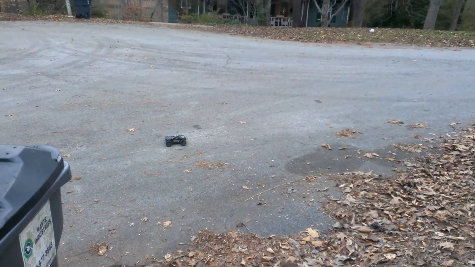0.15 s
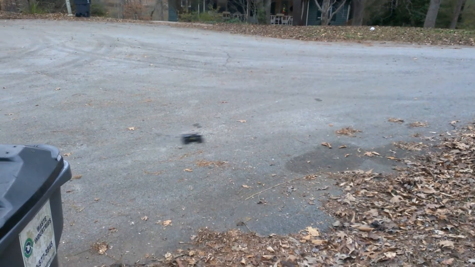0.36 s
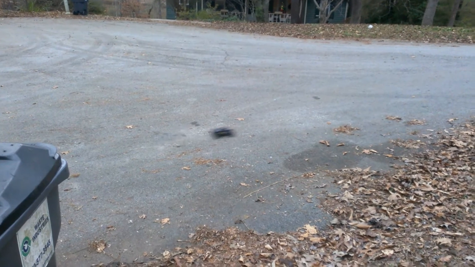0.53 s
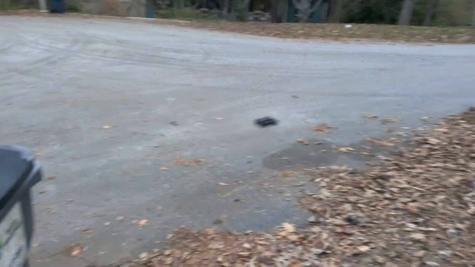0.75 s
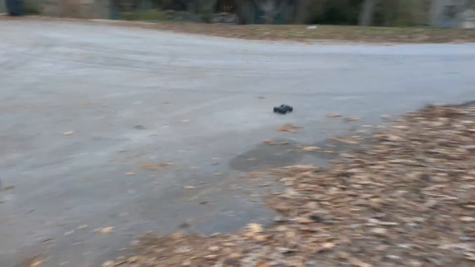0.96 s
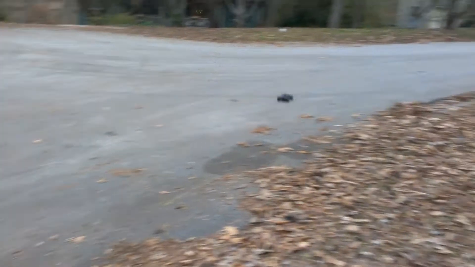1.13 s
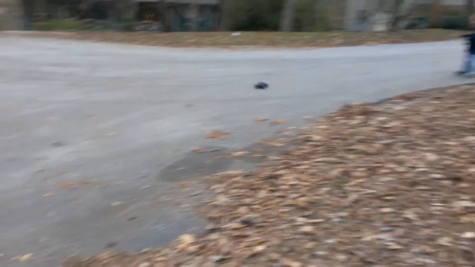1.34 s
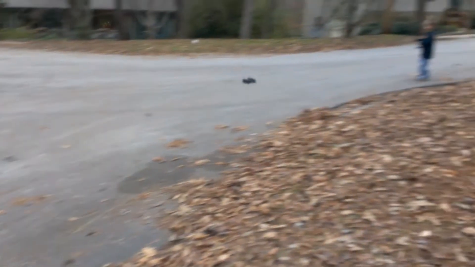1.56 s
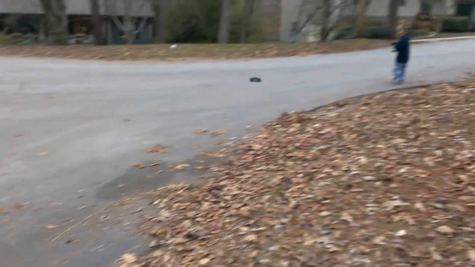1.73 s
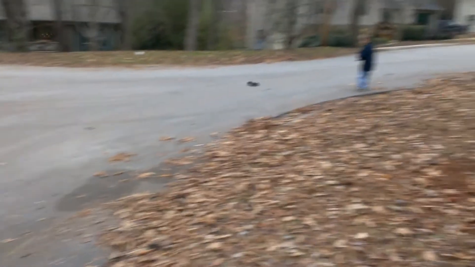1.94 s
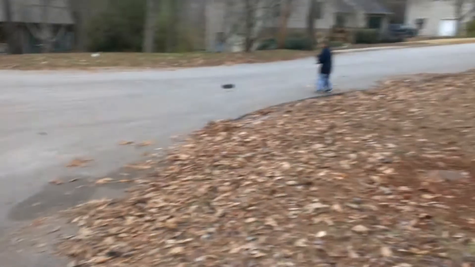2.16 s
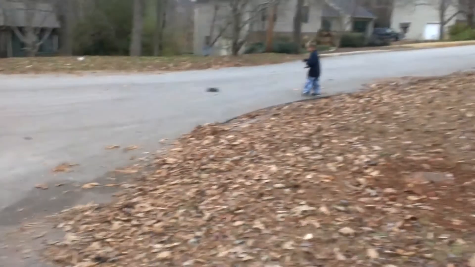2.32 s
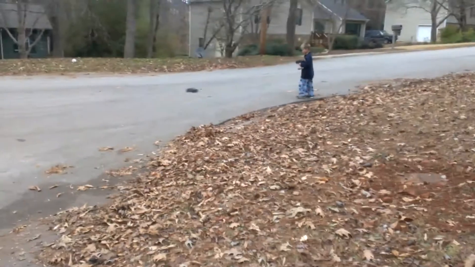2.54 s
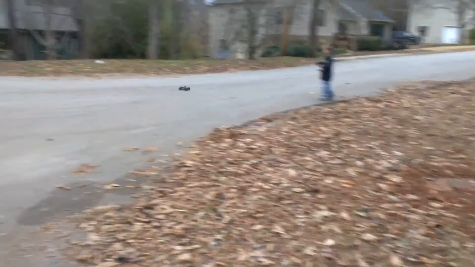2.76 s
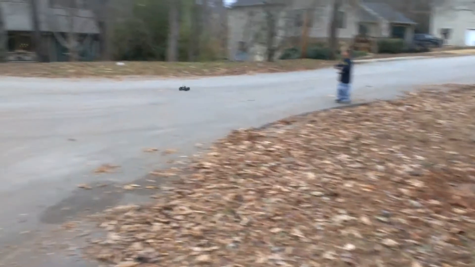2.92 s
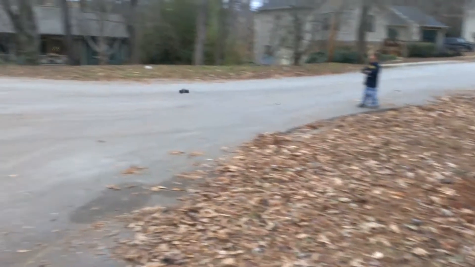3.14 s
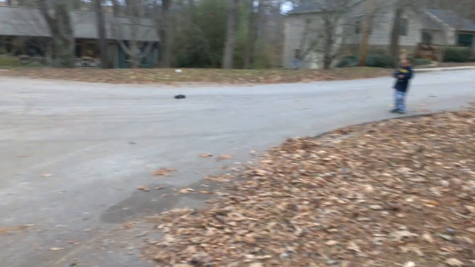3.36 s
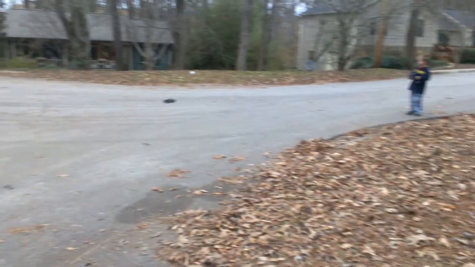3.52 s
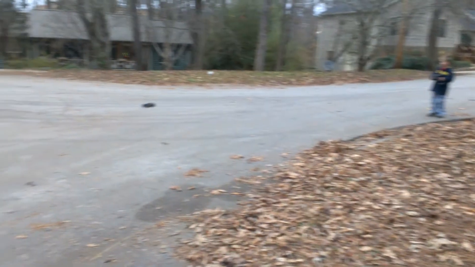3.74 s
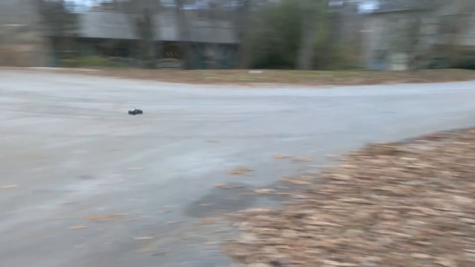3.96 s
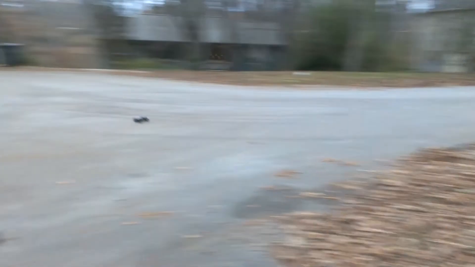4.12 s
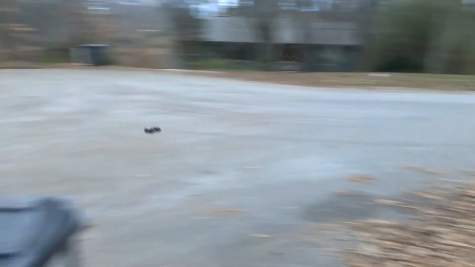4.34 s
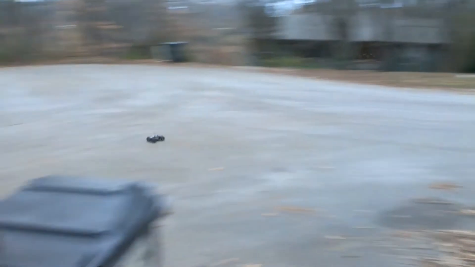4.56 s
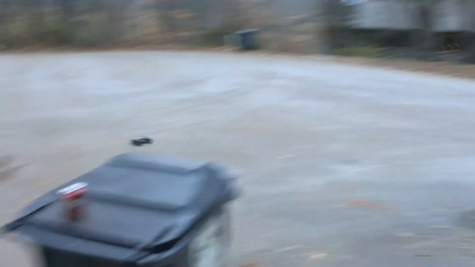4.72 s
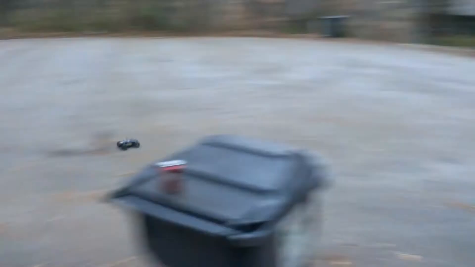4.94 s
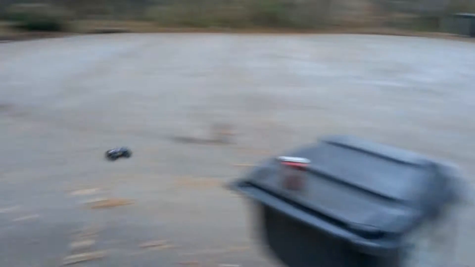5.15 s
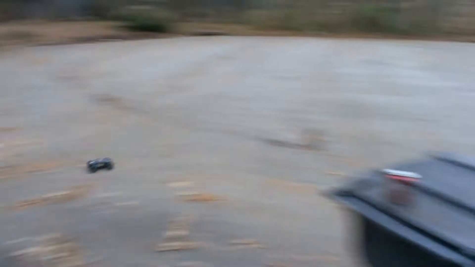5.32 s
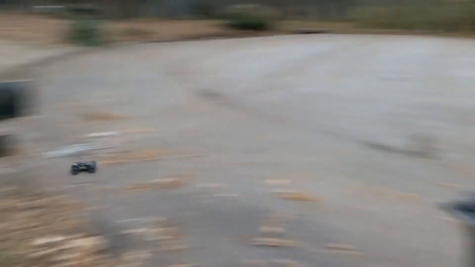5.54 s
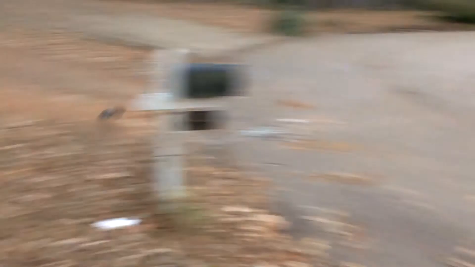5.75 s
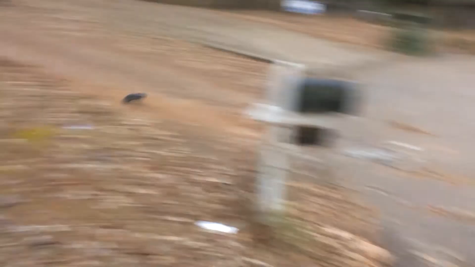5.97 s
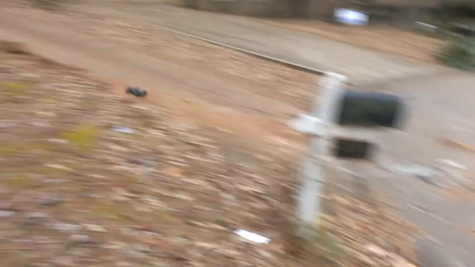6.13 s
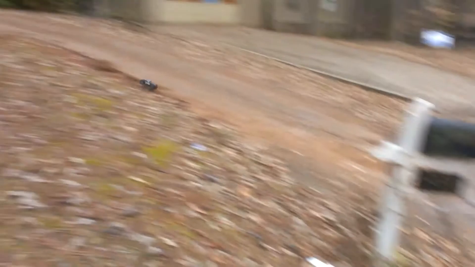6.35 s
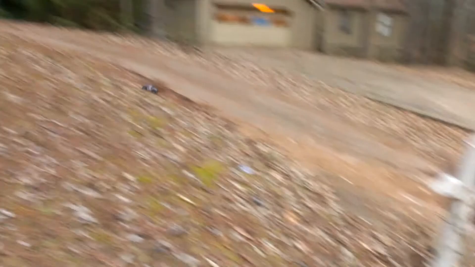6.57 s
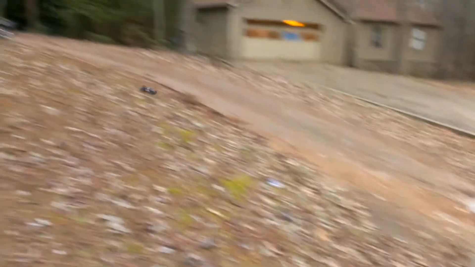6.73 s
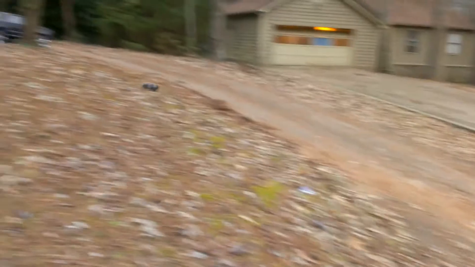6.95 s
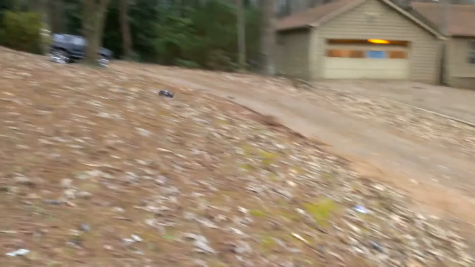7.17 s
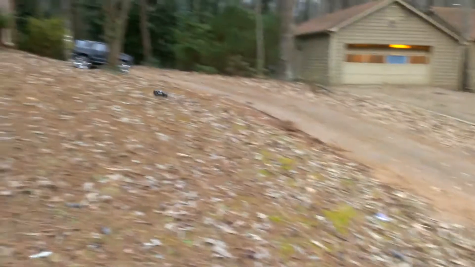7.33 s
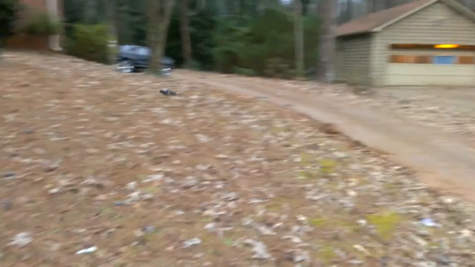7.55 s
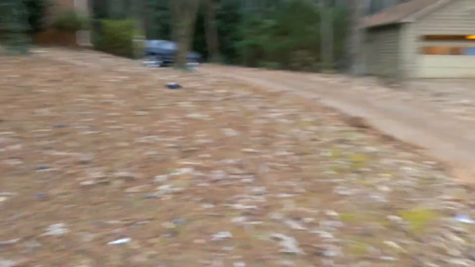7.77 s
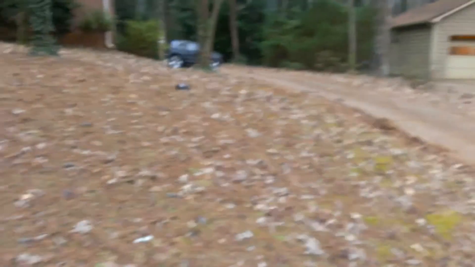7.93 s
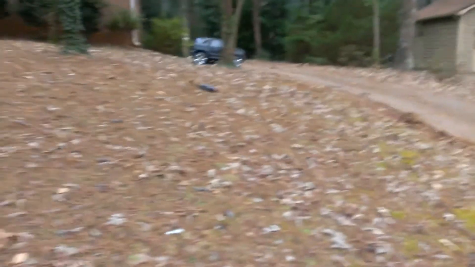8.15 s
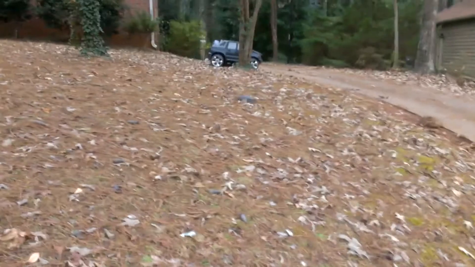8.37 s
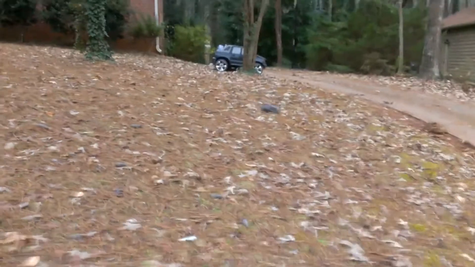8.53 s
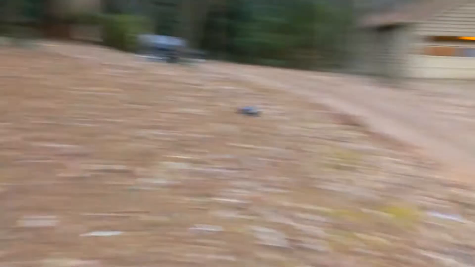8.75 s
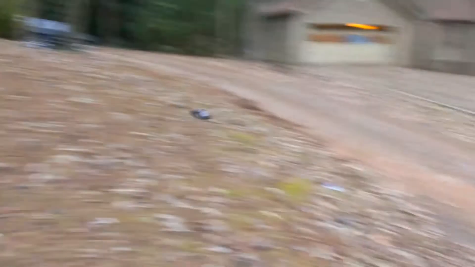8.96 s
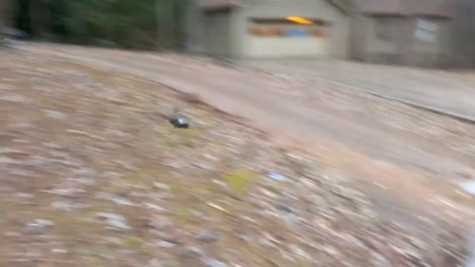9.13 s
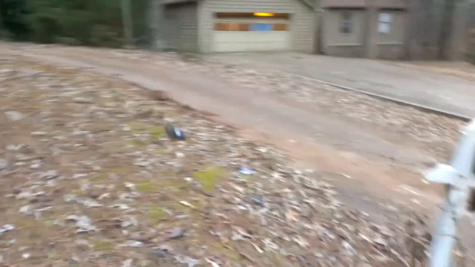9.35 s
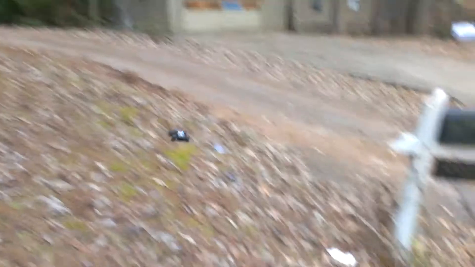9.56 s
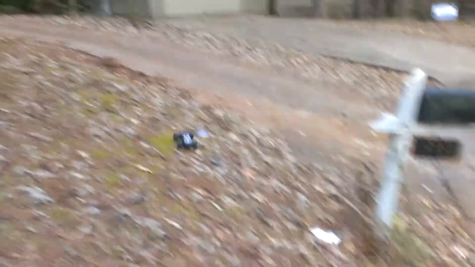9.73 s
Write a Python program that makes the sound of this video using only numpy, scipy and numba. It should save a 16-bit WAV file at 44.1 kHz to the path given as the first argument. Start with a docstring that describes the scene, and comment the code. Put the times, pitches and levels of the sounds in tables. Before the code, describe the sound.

Buzzy toy truck gear whine surges, drops and climbs again on pavement, then a kerb knock gives way to bursts of crunching dry leaves.

```python
"""On a quiet asphalt street a small electric toy truck races, slides to a stop and returns.
Then it jumps the kerb and ploughs through dry leaves. Its gear teeth whine and wobble once a turn.
The drive is random clicks ringing in the plastic shell; bumps are short bursts of ringing noise.
Leaves are clicks of many sizes in broader resonances, with grit, fizz and snapping twigs on top.
Behind it lie a soft street hush and the low drone of the tyres, both made of shaped noise."""
import sys
import numpy as np
from scipy import signal
from scipy.fft import rfft, irfft, next_fast_len
from scipy.io import wavfile
from scipy.ndimage import uniform_filter1d
from numba import njit

SR = 44100
rng = np.random.default_rng(int(sys.argv[2]) if len(sys.argv) > 2 else 0)


def transcribe(u):
    """Save the signal u as a 16-bit wav file named by the first command-line argument.

    u: samples, shape (n,) or (channels, n), limited to [-1, 1]; the rate is SR.
    q: integer samples, one column per channel.
    """
    v = np.clip(np.atleast_2d(u).T, -1, 1)
    q = np.round(v * 32767).astype(np.int16)
    wavfile.write(sys.argv[1], SR, q)


def linear_from_db(decibels):
    """Turn decibels (scalar or array-like) into linear amplitude factors; 0 gives 1."""
    return 10 ** (np.asarray(decibels, float) / 20)


N = 431738
T = np.arange(N) / SR

# Far street hush. Each row: frequency in Hz, relative level in dB.
STREET_COLOUR = [(15, -61), (25, -24), (253, 4.5), (378, -9), (482, -16), (782, 6.5), (1050, 0.5),
                 (1490, -8.5), (3440, -15.5), (3930, -13.5), (15500, -17)]
STREET_DB = -58.5
# Slow swell of the low tyre drone. Each row: time in seconds, change in dB.
TYRE_SWELL = [(0, 6), (1, 1), (2.8, -1), (3.8, 2), (5, 4), (6.5, -1), (8.3, 2.5), (9.79, -1.5)]
# Drone level at a truck level of -34 dB with no swell, and how many dB it moves per dB of truck.
TYRES_DB, TYRES_FOLLOW = -57.5, 0.52

# Gear mesh as the truck speeds up and slows. Each row: time in seconds, mean tooth rate in Hz.
TOOTH_RATE = [(0, 331.5), (.57, 337.6), (.6, 640), (.75, 785), (.84, 867), (.92, 970), (1.15, 1000),
              (1.37, 1085), (1.5, 1153), (1.72, 1261), (1.77, 1013), (2.15, 990), (2.22, 887), (2.3, 656),
              (2.55, 583), (2.65, 622), (2.76, 752), (2.8, 700), (3.3, 789.5), (3.42, 894), (3.7, 1010),
              (4.05, 1211), (4.27, 1318), (4.55, 1356), (4.75, 1394), (5.62, 1362), (5.72, 954),
              (5.85, 960), (5.95, 948), (5.98, 801), (6.05, 1200), (6.09, 990), (6.13, 934), (6.15, 779),
              (6.18, 984), (6.2, 1132), (6.225, 904), (6.27, 1000), (6.31, 1000), (6.325, 1120),
              (6.385, 1055), (6.405, 1132), (6.43, 908), (6.46, 1159), (6.48, 1025), (6.7, 966), (7.0, 885),
              (8.35, 848), (8.52, 904), (8.57, 858), (8.61, 929), (8.66, 893), (8.76, 926), (8.83, 1034),
              (8.865, 1176), (8.9, 1000), (8.95, 903), (9.01, 1054), (9.04, 948), (9.09, 1048),
              (9.145, 904), (9.18, 1000), (9.22, 1144), (9.24, 890), (9.28, 947), (9.36, 1180), (9.4, 1050),
              (9.42, 1097), (9.44, 856), (9.465, 1000), (9.49, 827), (9.515, 1025), (9.53, 944),
              (9.57, 1046), (9.59, 905), (9.626, 1070), (9.65, 953), (9.684, 1056), (9.7, 916), (9.73, 990),
              (9.762, 969), (9.79, 1147)]
TEETH = 38
# How strongly the off-centre gear shows. Each row: time in seconds, factor.
GEAR_WOBBLE = [(0, .6), (.6, 1.8), (.85, 1.6), (.95, 1), (1.1, .9), (1.17, .5), (1.3, .7), (1.45, .65),
               (1.7, .6), (1.9, .5), (3.5, .55), (3.75, .25), (4.05, .25), (4.2, .4), (5.6, .45), (5.7, .3),
               (9.79, .3)]
# The whine stands out while it crosses this shell resonance.
# The one row: centre in Hz, width in Hz (on asphalt), greatest share from 0 to 1.
WHINE_RESONANCE = (1018, 220, 0.91)
# A weaker resonance at top speed. The one row: centre in Hz, width in Hz, greatest share from 0 to 1.
HIGH_WHINE_RESONANCE = (1260, 110, 0.17)
# Shell resonances that carry the upper partials.
# Each row: centre in Hz, width in Hz, dB over the rattle of that range.
PARTIAL_CARRIERS = [(1000, 49, 7.5), (2150, 280, -1.5), (3150, 250, 4), (3800, 290, 0.5), (4350, 250, 1),
                    (5450, 350, 1)]
# Strength of the whine's overtones, greatest on asphalt as the motor pulls.
# Each row: time in seconds, level in dB.
OVERTONES = [(0, -2), (.56, -4.5), (.68, 6.5), (.8, 10), (.87, -4), (.92, -4), (1.05, -4), (1.12, 2),
             (1.3, 4), (1.42, -1), (1.55, 7), (1.7, 4.5), (1.8, -31), (2.15, 2.5), (2.4, -9), (2.6, 15),
             (2.75, -5), (2.85, -29), (3.3, -7), (3.6, -8.5), (3.87, -3.5), (4.05, -3), (4.27, 3),
             (4.6, -1), (5.55, -14), (5.65, -24), (6.19, -20), (6.21, 3), (6.23, -20), (6.39, -23),
             (6.412, -5), (6.435, -9), (9.79, -23)]
# Second partial. Each row: time in seconds, dB against the overtone strength.
SECOND_PARTIAL = [(0, -2), (1, -2), (1.5, -3.5), (3.3, -3), (3.6, 5), (3.9, 7), (4.1, 0), (4.4, 0),
                  (5.6, -16), (6, -15), (9.79, -15)]
# Fourth and fifth partials. Each row: time in seconds, dB against the overtone strength.
HIGHEST_PARTIALS = [(0, -40), (.6, -40), (.8, -12.5), (.95, 0), (1.2, -12.5), (1.45, -5.5), (1.7, -12),
                    (2.2, -40), (3.2, -40), (3.4, -10), (3.8, -19), (4.3, -24), (9.79, -24)]
# Third partial against the overtone strength, and carrying power between resonances.
THIRD_DB, OFF_RESONANCE_DB = -1.5, -23.5
# A slower gear stage. Each row: time in seconds, dB against the drive.
SLOW_STAGE = [(0, -22), (1.5, -7.5), (2.3, -22), (4.2, -9.5), (4.6, -2), (4.85, -2), (5.1, -3), (5.28, -8),
              (5.33, 3), (5.42, 4), (5.5, 3), (5.6, 8), (5.7, -10), (9.79, -9)]
# In the leaves the gears sing only while the wheels bite.
# Each row: centre in seconds, half length in seconds.
WHEEL_BITES = [(5.842, 0.011), (5.942, 0.024), (5.977, 0.0063), (6.049, 0.013), (6.117, 0.014),
               (6.212, 0.013), (6.292, 0.023), (6.34, 0.02), (6.375, 0.015), (6.418, 0.015),
               (6.468, 0.0084), (6.51, 0.012), (6.587, 0.016), (8.477, 0.011), (8.52, 0.0087),
               (8.57, 0.031), (8.605, .012), (8.66, 0.0077), (8.76, 0.017), (8.821, 0.018), (8.861, 0.019),
               (8.893, .012), (8.924, 0.0099), (9.016, 0.013), (9.091, 0.0071), (9.138, 0.015),
               (9.188, 0.016), (9.217, 0.011), (9.243, 0.0069), (9.268, .008), (9.359, 0.014),
               (9.406, 0.01), (9.424, 0.013), (9.472, .01), (9.493, 0.0086), (9.519, 0.011), (9.577, 0.013),
               (9.616, 0.017), (9.663, 0.0087), (9.691, 0.013), (9.748, 0.011), (9.776, 0.017)]
KERB_S = 5.63
# In the leaves: flicker of the drive (dB), whine left between bites (share), lift of the whine (dB).
BOUNCE_DB, SLIPPING, BITE_DB = 0.57, 0.3, 4.5

# Drive in the lowest shell range. Each row: time in seconds, level in dB.
DRIVE_LEVEL = [(0.0, -96), (0.3, -58), (0.43, -43.5), (0.65, -44.5), (0.95, -28), (1.12, -27.5),
               (1.77, -33), (1.8, -29.5), (2.07, -34), (2.1, -33.5), (2.18, -30), (2.21, -39),
               (2.24, -31.5), (2.29, -43), (2.31, -32), (2.48, -52), (3.24, -50), (3.68, -31.5),
               (4.25, -37), (4.66, -35), (4.77, -38), (5.34, -34.5), (5.37, -44), (5.42, -30), (5.48, -40),
               (5.51, -30), (5.64, -41), (5.67, -34), (5.74, -46), (5.9, -44), (5.96, -37.5), (6.07, -46),
               (6.11, -42.5), (6.17, -40), (6.22, -38), (6.24, -48), (6.35, -39), (6.43, -41.5),
               (6.44, -51), (6.62, -52.5), (6.66, -68), (6.71, -47), (6.8, -65), (7.0, -49), (7.01, -62),
               (7.33, -49), (7.39, -69), (7.43, -51), (7.62, -59), (7.83, -48.5), (7.89, -65), (8.06, -66),
               (8.12, -48), (8.43, -49.5), (8.47, -39), (8.49, -48), (8.56, -40.5), (8.73, -51),
               (8.76, -35.5), (8.79, -52), (8.82, -38.5), (9.0, -45), (9.02, -35), (9.05, -44),
               (9.19, -39.5), (9.32, -50), (9.37, -40), (9.79, -39.5)]
# Rattle on asphalt, three middle ranges together. Each row: time in seconds, level in dB.
ROAD_LEVEL = [(0.15, -75), (0.33, -53), (0.44, -41.5), (0.85, -26.5), (0.94, -30.5), (2.01, -31),
              (2.23, -31.5), (2.26, -26), (2.28, -43), (2.3, -29.5), (2.34, -39), (2.37, -34),
              (2.48, -43.5), (2.75, -35), (2.79, -42.5), (2.89, -43), (2.96, -38.5), (3.25, -42.5),
              (3.39, -34.5), (3.72, -36), (4.31, -29), (4.6, -29), (4.96, -34.5), (5.04, -30), (5.66, -28),
              (5.67, -19.5), (5.72, -63)]
# Rustle in leaves, three middle ranges together. Each row: time in seconds, level in dB.
LEAF_LEVEL = [(5.7, -40), (5.73, -38.5), (5.75, -30), (5.78, -33.5), (5.82, -27.5), (5.88, -31),
              (5.98, -27), (6.01, -34.5), (6.22, -38.5), (6.23, -45.5), (6.42, -34.5), (6.44, -47.5),
              (6.46, -37.5), (6.47, -47.5), (6.69, -47.5), (6.72, -43), (6.73, -46.5), (6.86, -43.5),
              (6.88, -48.5), (6.92, -37.5), (7.03, -44.5), (7.05, -40), (7.16, -44.5), (7.17, -39),
              (7.24, -41), (7.3, -30), (7.36, -36), (7.38, -48.5), (7.44, -38), (7.77, -39), (7.82, -36),
              (7.99, -50.5), (8.05, -44), (8.06, -50), (8.09, -34), (8.15, -28), (8.24, -32.5),
              (8.302, -28), (8.386, -33.5), (8.462, -27.5), (8.5, -32), (8.614, -32), (8.632, -37),
              (8.69, -34), (8.694, -28.5), (8.736, -36), (8.76, -31), (8.794, -41.5), (8.864, -32),
              (8.93, -27.5), (8.954, -38), (9.012, -25), (9.13, -24), (9.14, -27.5), (9.248, -34.5),
              (9.296, -42.5), (9.4, -23.5), (9.484, -25.5), (9.584, -22.5), (9.74, -35.5), (9.75, -27.5),
              (9.79, -29)]
# Plastic shell: five ranges, each a group of resonances.
# Each row: centre in Hz, width in Hz, relative level in dB.
SHELL_RANGES = [
    [(700, 146, -1.5), (990, 210, 6), (1330, 220, -14)],
    [(1790, 230, 30.5), (2150, 350, 38), (2330, 280, 36)],
    [(3490, 550, 16), (4180, 1180, 15.5)],
    [(4640, 220, 17), (5250, 4200, 5), (6090, 245, 15.5)],
    [(7420, 1500, 13), (8700, 3000, 5)],
]
# Leaf litter: five ranges, mostly broad. Each row: centre in Hz, width in Hz, relative level in dB.
LITTER_RANGES = [
    [(728, 240, 0.5), (1000, 244, 5.5)],
    [(1846, 250, -1.5), (2146, 460, 5)],
    [(3470, 670, -2.5), (4200, 510, 0)],
    [(4800, 290, 15), (5150, 560, 17.5), (6584, 1310, 19.5)],
    [(7840, 2000, 6), (10350, 200, -2)],
]
# Borders between the lower four ranges, in Hz.
RANGE_EDGES_HZ = (1500, 2700, 4600)
# Colour and side as the truck turns. Each row: time in seconds, second range over the next two in dB,
# fourth over third in dB, top range in dB, left minus right in dB before each sound's own factor.
FACING = [(0, 24, -35, -19, 5), (.5, -3.5, -1.5, -15, 1.5), (.68, -3, -1.5, -17, 0.5),
          (.82, -2.5, 0, -22, 0), (1.0, -4, 5, -17, 1), (1.37, -1, 1, -17, 0.5),
          (1.7, -2.5, -0.5, -17, 0.5), (2.3, -2.5, 1.5, -22, 0.5), (2.55, -10.5, -7, -19, 1),
          (2.72, 1, -7.5, -24, 1), (2.9, -6, -21, -27, 1), (3.3, -2, 5.5, -19.5, 1),
          (3.95, 0, -4, -16.5, 2), (4.3, 0, -6.5, -17.5, 1.5), (4.65, -2, -6, -16, 2),
          (4.9, -0.5, 2.5, -13, 1.5), (5.05, 5, 7, -9.5, 2), (5.4, 1, 8, -9.5, 2.5), (5.65, 2, 21, -6, 1.5),
          (5.8, -25, -2.5, -23, 1), (6.1, -15, -4, -11, 1), (6.4, -18, -1, -14, 1),
          (6.8, -16, -0.5, -13, 1), (7.6, -16, 3, -11.5, 0.5), (8.2, -10, 12, -8, 0),
          (8.45, -13.5, 9.5, -16, 0.14), (8.75, -13, 10, -9, 0), (9.1, -11, 4.5, -11.5, 0),
          (9.4, -13, 5, -16, 0), (9.6, -5, 5.5, -17, 0.5), (9.79, -10, 4.5, -13, 0)]
# One band stands out in each middle range and wanders as the truck moves.
# Each row: time in seconds, then three centres in Hz.
WANDERING_BANDS = [(0.3, 2550, 3900, 4300), (.43, 2500, 3700, 4000), (.5, 2580, 3400, 4640),
                   (.56, 2720, 3400, 4700), (0.63, 2280, 3320, 5170), (.96, 2150, 3400, 5450),
                   (1.25, 2160, 3100, 5470), (1.5, 2030, 3680, 5200), (1.8, 1944, 3470, 5400),
                   (2.15, 1915, 3320, 5720), (2.47, 1720, 3560, 5403), (2.6, 1750, 3570, 4800),
                   (2.76, 2150, 3680, 4670), (2.85, 1933, 3464, 4640), (3.3, 2005, 3560, 4430),
                   (4.0, 2150, 3730, 4570), (4.7, 1980, 3750, 4462), (5.0, 2150, 4120, 4540),
                   (5.1, 2150, 3988, 4480), (5.2, 2150, 4355, 4750), (5.3, 2150, 4174, 5100),
                   (5.42, 2104, 3540, 5500), (5.5, 2114, 3450, 5200), (5.56, 2050, 3540, 5500),
                   (5.62, 2070, 3570, 5200), (5.7, 2010, 3500, 5890), (5.9, 2470, 3650, 4550),
                   (6.7, 2500, 4020, 5230), (6.95, 2290, 3800, 4840), (7.1, 2180, 3470, 4800),
                   (7.3, 2363, 3300, 5120), (7.5, 2380, 3900, 5075), (7.65, 2390, 4140, 4800),
                   (7.8, 1900, 3700, 4980), (7.9, 2050, 3970, 5250), (8.3, 2198, 3220, 5650),
                   (8.6, 2000, 3470, 5940), (9.2, 2110, 3670, 5255), (9.79, 2150, 3740, 5210)]
# How far these bands stand out. Each row: time in seconds, share.
BAND_SHARE = [(0, .6), (.6, .5), (.9, .8), (1.1, .5), (1.4, .5), (1.6, .9), (2.3, .9), (2.6, .5),
              (2.76, .6), (2.85, .15), (3.2, .2), (3.4, .8), (4.1, .7), (4.7, .5), (5.2, .3), (5.6, .5),
              (6.5, .6), (6.8, .25), (7.9, .25), (8.3, .7), (9.79, .7)]
# The rattle dips just before each jolt: depth in dB, and both lead and spread in seconds.
AIRBORNE_DB, AIRBORNE_S = -1.5, 0.019

# Grit thrown against the chassis, filling the gap between shell ranges.
# Each row: time in seconds, dB against the rattle or rustle.
GRIT_LEVEL = [(0, -25), (4.4, -7.5), (4.9, -10), (5.3, -7), (5.6, -13), (6.1, -9), (6.5, -11.5), (7.5, -11),
              (8.1, -10), (8.3, -1.5), (8.4, -9.5), (9, -13.5), (9.79, -8.5)]
# Fizz of tiny clicks. Each row: time in seconds, level in dB.
FIZZ_LEVEL = [(0.0, -65), (0.01, -88), (0.93, -61.5), (2.41, -74), (2.59, -86), (2.66, -63), (2.84, -84),
              (3.42, -74), (4.7, -51.5), (4.8, -53.5), (5.35, -44.5), (5.65, -52), (5.67, -41), (5.72, -60),
              (5.83, -50), (5.87, -54), (5.99, -48), (6.01, -49), (6.19, -61), (6.22, -48), (6.24, -63),
              (6.41, -51), (6.56, -66), (6.87, -51), (7.23, -53), (7.3, -39), (7.36, -54), (7.38, -68),
              (7.45, -54), (7.77, -50), (7.81, -46), (7.91, -58), (8.05, -59), (8.12, -42), (8.19, -41),
              (8.23, -49), (8.33, -45), (8.36, -50), (8.44, -44), (8.76, -49), (8.79, -61), (8.88, -42),
              (8.97, -50), (9.04, -40.5), (9.25, -45.5), (9.3, -55), (9.36, -44), (9.61, -37.5),
              (9.73, -53), (9.75, -30), (9.79, -50)]
# Colour of the fizz. Each row: centre in Hz, width in Hz, relative level in dB.
FIZZ_BANDS = [(10940, 1600, 3), (12270, 500, -1.5), (13600, 1700, -4.5), (15400, 680, -1)]
# Speed controller singing in the stalled motor. Each row: time in seconds, level in dB.
STALL_LEVEL = [(0.18, -81), (0.194, -48), (0.212, -46.5), (0.3, -61), (0.43, -51), (0.456, -36.5),
               (0.484, -42), (0.52, -46)]
STALL_HZ = 1347
# Jolts over bumps. Each row: start in seconds, shake in dB and thump in dB (both before the soft
# attack), decay in seconds.
BUMPS = [(0.194, -33, -43, 0.0048), (0.3564, -35, -66, 0.0073), (0.391, -37, -66, 0.009),
         (1.5554, -19, -38, 0.0097), (1.6182, -24, -35, 0.016), (1.689, -24, -60, 0.0088),
         (1.785, -17, -60, 0.016), (1.854, -19.5, -65, 0.017), (1.924, -12, -56, 0.0097),
         (1.9829, -20.5, -66, 0.021), (2.041, -20, -49, 0.011), (2.178, -11.5, -65, 0.0066),
         (2.239, -19, -74, 0.0075), (2.2917, -18.5, -54, 0.0084), (2.3595, -36, -49, 0.025),
         (2.4854, -28, -68, 0.0062), (2.6, -41, -63, 0.016), (2.666, -35, -38.5, 0.02),
         (2.9633, -35, -51, 0.011), (5.043, -20, -33, 0.015), (5.156, -18, -37, 0.015),
         (5.2305, -18, -37, 0.0086), (5.3246, -17.5, -32, 0.0094), (5.418, -39, -46, 0.022),
         (5.4998, -47, -45, 0.045), (5.654, -21.5, -18, 0.014), (5.668, -19.5, -44, 0.021),
         (5.7482, -27, -59, 0.008), (5.9511, -32, -35.5, 0.02), (6.079, -24, -32, 0.014),
         (6.099, -28, -34.5, 0.017), (6.2094, -34, -34.5, 0.014), (6.285, -53, -44, 0.012),
         (6.338, -42, -55, 0.0058)]
# Twigs and leaves that snap. Each row: start in seconds, peak in dB, colour in Hz.
SNAP_EVENTS = [(6.859, -27, 4800), (6.9211, -24, 4800), (7.046, -29, 6750), (7.09, -25, 5000),
               (7.171, -25, 4800), (7.2, -26, 4250), (7.258, -33, 3900), (7.3592, -29, 4100),
               (7.633, -36, 4840), (8.017, -38, 5100), (8.083, -33, 5300), (8.144, -13, 5100),
               (8.19, -16.5, 3580), (8.3042, -16, 2560), (8.4544, -35, 5200), (8.533, -33, 5250),
               (8.6937, -22, 5630), (8.7547, -31, 5250), (8.9714, -30, 3600), (9.072, -23, 6525),
               (9.4863, -20, 6803), (9.587, -18, 4350), (9.7486, -15, 4086)]
# Valleys in the colour that slide as the truck moves, likely the bounce off the ground.
# Each row: time in seconds, three centres in Hz, depth of the lowest from 0 to 1.
VALLEYS = [(0, 2950, 7200, 10800, 0.5), (.9, 2940, 7340, 10500, 0.5), (1.2, 2669, 7040, 11100, .8),
           (1.6, 2600, 7200, 11100, .6), (2.4, 2950, 6900, 10460, 0.8), (3.6, 2950, 6807, 9800, .8),
           (4.1, 2800, 7100, 10100, 0.1), (4.6, 2620, 7800, 10200, .4), (5.1, 2600, 8100, 10600, 0.3),
           (5.5, 2700, 8300, 11000, .2), (5.8, 2840, 7350, 10100, 0), (6.6, 2833, 7480, 10000, 0.15),
           (7.3, 2788, 8620, 12440, 0), (8.0, 2800, 8600, 11900, 0.05), (8.4, 2737, 7430, 10110, 0.82),
           (9.79, 2790, 7725, 10090, 0.56)]
# Widths of the three valleys, in Hz.
VALLEY_WIDTHS_HZ = (400, 800, 1200)
TREBLE_DEPTH = 0.85  # depth of the upper two, 0 to 1


def unit(x):
    """Scale to rms 1."""
    return x / np.sqrt(np.mean(x ** 2))


def curves(table):
    """Draw straight lines through every column of a table after the time column."""
    s, *columns = np.transpose(table)
    return [np.interp(T, s, column) for column in columns]


def curve(table):
    """Draw the first column after the time column."""
    return curves(table)[0]


def gate(table):
    """1 while the table lasts and 0 outside, with 20 ms ramps."""
    first, last = table[0][0], table[-1][0]
    return np.interp(T, [first - .02, first, last, last + .02], [0, 1, 1, 0])


def ring(x, modes, order=1):
    """Add up resonances of alternating sign; a higher order darkens the valleys between them."""
    out = 0
    for k, (hz, width_hz, db) in enumerate(modes):
        y = x
        for _ in range(order):
            y = signal.lfilter(*signal.iirpeak(hz, hz / width_hz / np.sqrt(order), SR), y)
        out = out + (-1) ** k * linear_from_db(db) * unit(y)
    return unit(out)


@njit
def glide(x, hz, width):
    """Band-pass with a moving centre: a state-variable filter whose two memories follow the sound."""
    y, band, low = np.empty(len(x)), 0., 0.
    for i in range(len(x)):
        g, damping = np.tan(np.pi * hz[i] / SR), width / hz[i]
        v = (band + g * (x[i] - low)) / (1 + g * (g + damping))
        band, low = 2 * v - band, low + 2 * g * v
        y[i] = damping * v
    return y


def walk(rate):
    """Random levels held 1 / rate seconds and smoothed twice, with rms 1."""
    hold = int(SR / rate)
    steps = np.repeat(rng.standard_normal(N // hold + 1), hold)
    return unit(uniform_filter1d(uniform_filter1d(steps, hold), hold)[:N])


def grains(per_s, spread_db, smear_s):
    """Random clicks of widely different sizes, each a short puff of noise."""
    size_db = spread_db * np.minimum(rng.exponential(size=N), 4.5)
    clicks = (rng.random(N) < per_s / SR) * linear_from_db(size_db)
    puff = signal.lfilter([1], [1, -np.exp(-1 / (smear_s * SR))], clicks)
    return unit(np.sqrt(puff) * rng.standard_normal(N))


def place(x, far, pan_db, wide):
    """Left and right: a pan plus a share of unrelated scattered sound."""
    side = np.array([[1.], [-1.]])
    return linear_from_db(side * pan_db / 2) * (x + wide * side * far) / np.sqrt(1 + wide ** 2)


def controls():
    """Levels of the five ranges (dB), of the rattle or rustle as a whole (dB), and the pan (dB)."""
    coarse = T[::64]
    dips = sum(np.exp(-((coarse - s) / AIRBORNE_S + 1) ** 2) for s, *_ in BUMPS)
    dip_db = AIRBORNE_DB * np.interp(T, coarse, dips)
    level = np.where(T < LEAF_LEVEL[0][0], curve(ROAD_LEVEL), curve(LEAF_LEVEL)) + dip_db
    second, slope, top, pan_db = curves(FACING)
    upper = np.array([second, -slope / 2, slope / 2])
    # the three middle ranges share the level between them
    upper = upper - 10 * np.log10(np.sum(linear_from_db(upper) ** 2, axis=0))
    drive = curve(DRIVE_LEVEL) + dip_db + BOUNCE_DB * walk(18) * (T > KERB_S)
    return [drive, *(level + upper), level + top], level, pan_db


def street(truck_db):
    """Smooth far hush, nearly alike left and right in the bass."""
    size = next_fast_len(N)
    hz = np.maximum(np.fft.rfftfreq(size, 1 / SR), 1)
    colour_hz, colour_db = np.transpose(STREET_COLOUR)
    colour = linear_from_db(np.interp(np.log(hz), np.log(colour_hz), colour_db))
    mid, side = irfft(rfft(rng.standard_normal((2, size))) * colour, size)[:, :N]
    side = signal.lfilter(*signal.butter(1, 1500, "high", fs=SR), side) + 0.045 * side
    hush = linear_from_db(STREET_DB) * (mid + np.outer([1, -1], side)) / np.std(mid)
    return hush + tyres(truck_db)


def tyres(truck_db):
    """Drone of small tyres: noise in low resonances that follows the smoothed truck level."""
    modes = [(139, 100, -16.0), (258, 132, -3.0), (349.6, 260, 1.5), (500, 494, -0.66)]
    near, far = (ring(rng.standard_normal(N), modes, order=2) for _ in range(2))
    follow_db = TYRES_FOLLOW * (uniform_filter1d(truck_db, size=SR // 5) + 34.0)
    db = TYRES_DB + curve(TYRE_SWELL) + follow_db + 2.0 * walk(10)
    return linear_from_db(db) * place(near, far, 0, 0.2)


def wheel_grip():
    """Bouncing wheels lose and regain grip in the leaves, from SLIPPING up to 1."""
    bite = np.full(N, 1. * SLIPPING)
    for s, half_s in WHEEL_BITES:
        near = slice(int((s - .06) * SR), int((s + .06) * SR))
        bite[near] = np.maximum(bite[near], np.exp(-((T[near] - s) / half_s) ** 4))
    return bite


def whine_share(hz, in_leaves):
    """Share of the lowest range that is pure tone, large where the tooth rate meets a resonance."""
    centre, width_hz, most = WHINE_RESONANCE
    share = np.clip(most, 0, .95) * np.exp(-((hz - centre) / (width_hz * (1 + 1.3 * in_leaves))) ** 2)
    centre, width_hz, most = HIGH_WHINE_RESONANCE
    share = np.maximum(share, most * np.exp(-((hz - centre) / width_hz) ** 2))
    return share * np.where(in_leaves, wheel_grip() ** 2, 1)


def carry(hz, levels):
    """How loudly the shell passes on a partial at this pitch."""
    range_db = np.choose(np.searchsorted(RANGE_EDGES_HZ, hz), levels[:-1])
    peaks = sum(linear_from_db(db) * np.exp(-((hz - at) / width_hz) ** 2) for at, width_hz, db in PARTIAL_CARRIERS)
    return linear_from_db(range_db) * (linear_from_db(OFF_RESONANCE_DB) + peaks)


def gears(levels):
    """Tooth whine; an off-centre gear bends pitch and level once a turn.
    Returns sound, tonal share and turn phase."""
    drift, wobble, rough_db = 0.01, 0.055, 3.0  # pitch shares, then flicker in dB
    load, low_db = curve(GEAR_WOBBLE), levels[0]
    in_leaves = T > KERB_S
    hz = curve(TOOTH_RATE) * (1 + .012 * in_leaves * walk(24))
    share = whine_share(hz, in_leaves)
    turn = 2 * np.pi * np.cumsum(hz * (1 + 0.0483 * walk(5.5))) / SR / TEETH
    bend = 1 + wobble * load * np.cos(turn) + drift * walk(50)
    phase = 2 * np.pi * np.cumsum(hz * bend) / SR
    beat = 1 + .75 * np.minimum(load, 1) * np.sin(turn)
    upper = linear_from_db(curve(OVERTONES))
    highest = linear_from_db(curve(HIGHEST_PARTIALS)) * upper
    partials = [
        (1, np.sqrt(share) * linear_from_db(low_db + BITE_DB * in_leaves)),
        (2, linear_from_db(curve(SECOND_PARTIAL)) * upper * carry(2 * hz, levels)),
        (3, linear_from_db(THIRD_DB) * upper * carry(3 * hz, levels)),
        (4, highest * carry(4 * hz, levels)),
        (5, highest * carry(5 * hz, levels))]
    whine = 0
    for multiple, gain in partials:
        # uneven teeth smear the higher partials
        smear = (multiple > 1) * .17 * multiple * walk(300)
        flicker = unit(linear_from_db(rough_db * walk(70)))
        whine = whine + gain * flicker * np.sqrt(2) * np.sin(multiple * phase + smear)
    return beat * whine + slow_stage(phase, low_db), share, turn


def slow_stage(phase, low_db):
    """A slower gear stage near half the tooth rate, heard once it reaches the lowest shell resonance."""
    db = low_db + curve(SLOW_STAGE) + 2 * walk(20)
    tone = linear_from_db(db) * np.sin(0.52 * phase + 3.04 * walk(200) + 9.094 * walk(25))
    return signal.sosfilt(signal.butter(2, (620, 860), "band", fs=SR, output="sos"), tone)


def grit(level_db, pan_db):
    """Short sharp grains ringing in the chassis plate."""
    modes = [(2950, 1700, 7.0), (1510, 1600, -6.5)]
    near, far = (ring(grains(1800, 3.9, 0.002), modes, order=2) for _ in range(2))
    return linear_from_db(level_db + curve(GRIT_LEVEL) + 2.0 * walk(20)) * place(near, far, pan_db, 0.54)


def fizz():
    """Tiny grit and leaf-edge clicks at the top of hearing."""
    near, far = (ring(grains(2300, 7.6, 0.0019), FIZZ_BANDS, order=2) for _ in range(2))
    db = curve(FIZZ_LEVEL) + 2.0 * walk(11) + 0.53 * walk(6.5)
    return linear_from_db(db) * place(near, far, 1.0, 0.37)


def body(table, levels, pan_db, ranges, excite, flicker_db, widths, tonal, lift, lift_width):
    """One excitation rings every range of resonances at that range's level, each with its own pan."""
    fade = gate(table)
    on = fade > 0
    near, far, shake = excite()[on], excite()[on], walk(18)
    bands = [None, *curves(WANDERING_BANDS), None]  # only the middle ranges have one
    pan_factors = (.2, 0.043, 5.6, 5.9, 0.15)
    out = np.zeros((2, N))
    for db, modes, wide, hz, aim in zip(levels, ranges, widths, bands, pan_factors):
        gain = fade * linear_from_db(db + flicker_db * shake + 1.1 * walk(5.0))
        direct = ring(near, modes, order=2)
        if hz is not None:
            width_hz = lift_width * hz.mean()
            hz = (hz * (1 + 0.016 * walk(14)))[on]
            band = unit(glide(glide(near, hz, width_hz), hz, width_hz))
            strength = (curve(BAND_SHARE) * linear_from_db(1.5 * walk(20)))[on]
            direct = unit(direct + lift * strength * band)
        if modes is ranges[0]:
            gain = gain * np.sqrt(1 - tonal)  # leave room for the whine
        out[:, on] += gain[on] * place(direct, ring(far, modes), aim * pan_db[on], wide)
    return out


def road_rattle(levels, pan_db, tonal, turn):
    """Loose teeth chatter in the plastic shell, hardest at one point of each turn."""
    def chatter():
        return unit(grains(4400, 1.2, 0.00035) * (1 + 0.13 * np.sin(turn)))
    return body(ROAD_LEVEL, levels, pan_db, SHELL_RANGES, chatter, 0.47,
                (0.26, 0.4, 0.38, 0.055, 0.85), tonal, 1.96, 0.11)


def stall():
    """A switching tone with two overtones, blurred into narrow hiss."""
    modes = [(STALL_HZ, 110, 0), (2 * STALL_HZ, 220, -12), (3 * STALL_HZ, 400, -16)]
    level = gate(STALL_LEVEL) * linear_from_db(curve(STALL_LEVEL) + 2.8 * walk(40.5))
    return level * ring(rng.standard_normal(N), modes, order=2)


def jolts():
    """Each bump shakes the whole shell for a moment and thumps the chassis."""
    attack_s = 0.0085
    shake, thump = np.zeros(N), np.zeros(N)
    for s, shake_db, thump_db, decay_s in BUMPS:
        i = int(s * SR)
        t = T[:min(int(8 * decay_s * SR), N - i)]
        shape = (1 - np.exp(-t / attack_s)) * np.exp(-t / decay_s)
        shake[i:i + len(t)] += linear_from_db(shake_db) * shape
        thump[i:i + len(t)] += linear_from_db(thump_db) * shape
    noise = rng.standard_normal(N)
    shell_modes = [(1000, 270, 13.5), (2190, 3500, 9.8), (3900, 3800, 8.0), (5200, 940, 11.6)]
    shell = ring(noise, shell_modes, order=2)
    shell = signal.sosfilt(signal.butter(4, 7000, fs=SR, output="sos"), shell)
    thump = thump * ring(noise, [(247, 220, -2.0), (414, 530, 0.069)], order=2)
    thump = signal.sosfilt(signal.butter(3, 160, "high", fs=SR, output="sos"), thump)
    return shake * shell + thump


def leaf_rustle(levels, pan_db, tonal):
    """Dry leaves crackle: many small clicks and a few rarer ones ring in the litter."""
    def crackle():
        return unit(grains(1500, 4, 0.002) + 0.55 * grains(90, 5, 0.001))
    return body(LEAF_LEVEL, levels, pan_db, LITTER_RANGES, crackle, 0.21,
                (0.29, 0.27, 0.48, 0.5, 0.21), tonal, 1.0, 0.23)


def snaps():
    """Brittle cracks of a few milliseconds: fading noise in one broad resonance."""
    decay_s = 0.0016
    out = np.zeros(N)
    t = T[:800]
    for s, peak_db, hz in SNAP_EVENTS:
        noise = rng.standard_normal(len(t))
        crack = ring(noise * np.exp(-t / decay_s), [(hz, 3200, 0)], order=2)
        i = int(s * SR)
        out[i:i + len(t)] += linear_from_db(peak_db) * crack / np.abs(crack).max()
    return out


def ground(x):
    """Carve the sliding valleys into both channels by taking away a moving band."""
    *valleys, depth = curves(VALLEYS)
    depths = (depth, TREBLE_DEPTH, TREBLE_DEPTH)
    for hz, width_hz, deep in zip(valleys, VALLEY_WIDTHS_HZ, depths):
        hz = hz * (1 + .02 * walk(12))
        x = np.array([v - np.clip(deep, 0, 1) * glide(v, hz, 1. * width_hz) for v in x])
    return x


def scene():
    """Truck on the road, truck in the leaves, and the street."""
    levels, level, pan_db = controls()
    whine, tonal, turn = gears(levels)
    road = road_rattle(levels, pan_db, tonal, turn)
    leaves = leaf_rustle(levels, pan_db, tonal)
    motor = place(whine + stall(), 0, 1.6 * pan_db, 0)
    knocks = place(jolts() + snaps(), 0, pan_db, 0)
    truck = ground(road + leaves + grit(level, pan_db) + fizz() + motor)
    truck_db = np.maximum(np.maximum(levels[0], level), -52)
    return truck + knocks + street(truck_db)


def roll_off(x):
    """The treble ends steeply here."""
    return signal.sosfilt(signal.butter(12, 17110, fs=SR, output="sos"), x)


def record(dry):
    """Two small ports, the left a fraction of a sample behind, lose the deep bass and the very top."""
    lag = .25  # all-pass coefficient
    dry = np.array([signal.lfilter([lag, 1], [1, lag], dry[0]), dry[1]])
    dry = signal.sosfilt(signal.butter(2, 100, "high", fs=SR, output="sos"), dry)
    dry = signal.sosfilt(signal.ellip(10, .2, 80, 15900, fs=SR, output="sos"), dry)
    return roll_off(dry)


dry = scene()
out = record(dry)
transcribe(out)
```